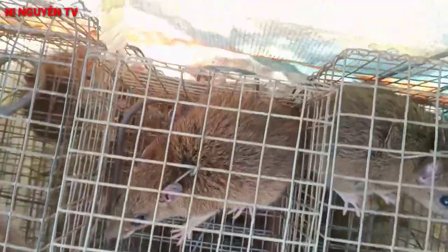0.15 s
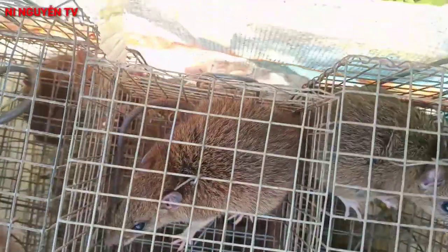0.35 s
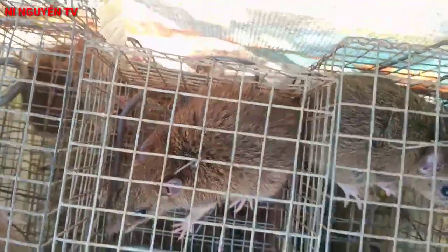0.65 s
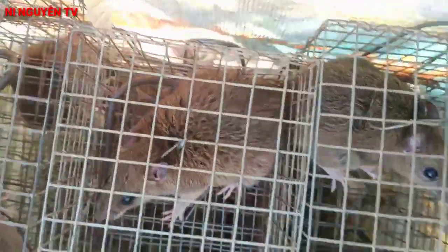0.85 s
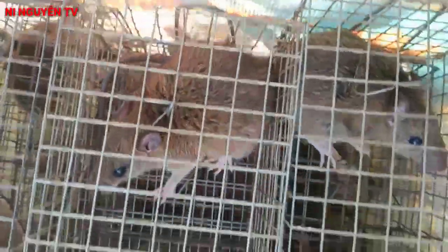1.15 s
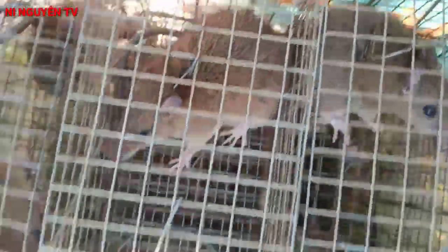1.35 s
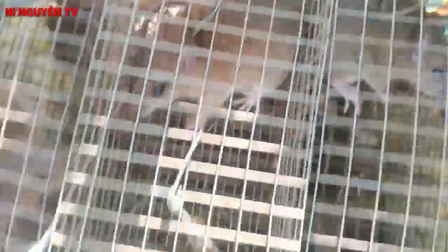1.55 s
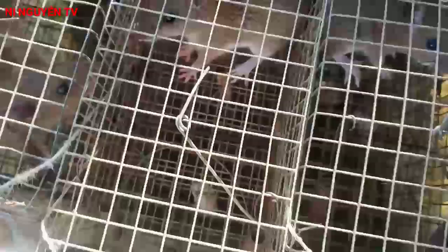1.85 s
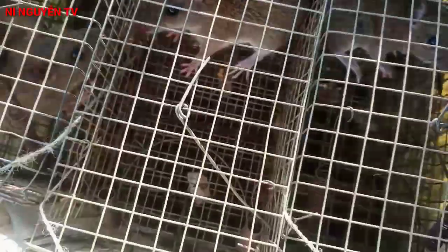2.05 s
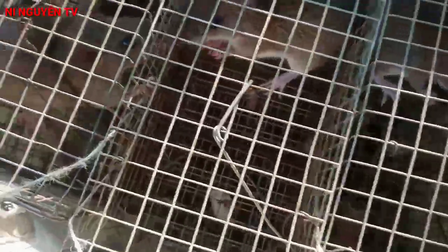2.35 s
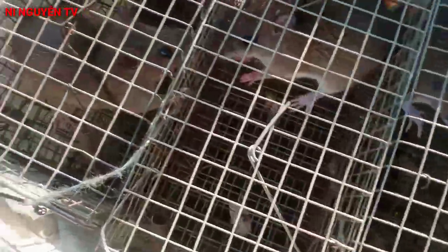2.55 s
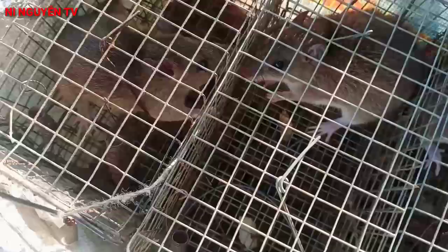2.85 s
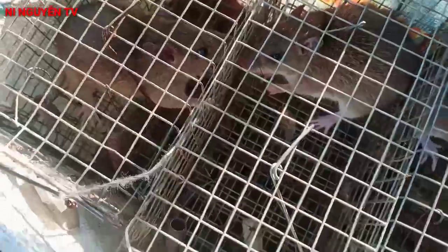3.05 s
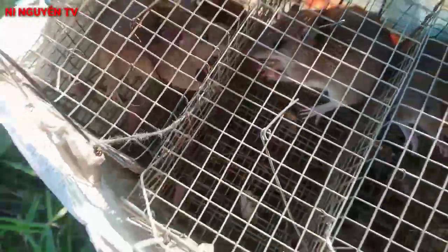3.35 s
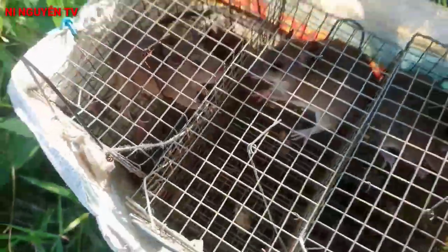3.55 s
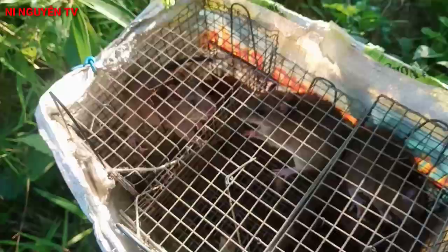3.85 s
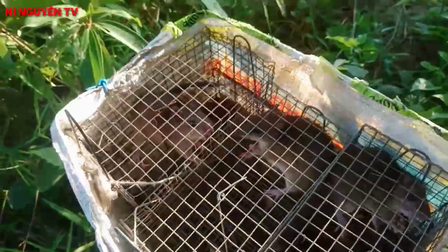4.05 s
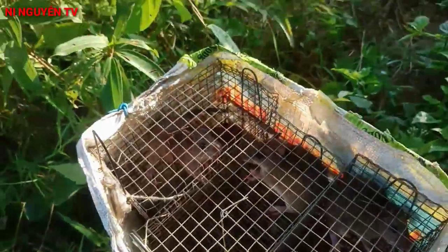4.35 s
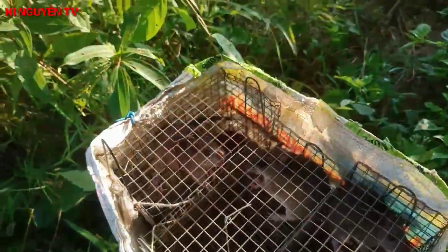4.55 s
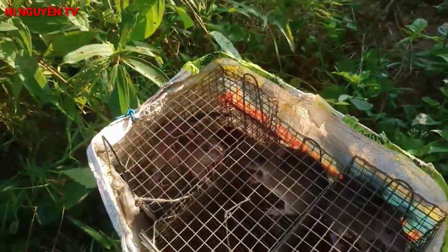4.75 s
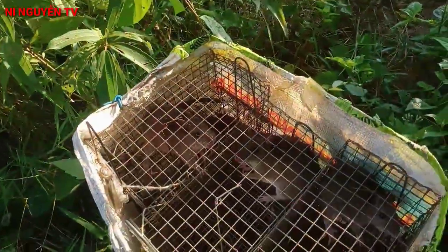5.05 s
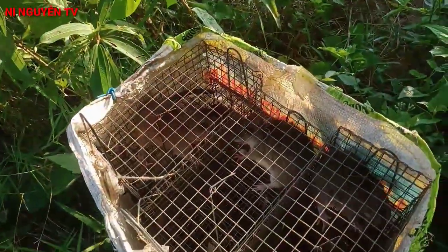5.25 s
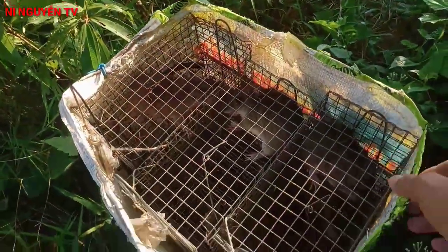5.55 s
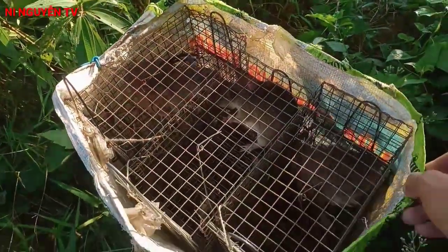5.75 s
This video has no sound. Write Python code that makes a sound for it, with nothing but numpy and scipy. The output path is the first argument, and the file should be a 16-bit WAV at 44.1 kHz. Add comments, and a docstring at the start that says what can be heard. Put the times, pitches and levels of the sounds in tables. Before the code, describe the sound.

The scene opens quietly outdoors, with a steady high insect drone, a faint distant engine hum and small birds chirping quickly. Claws scrape briefly on wire cages around 0.3, 0.5 and 1.6 seconds, and the foam box holding them takes a few soft knocks up to 2.5 seconds. At 1.8 seconds a rat whimpers and gives a shrill, trilling squeal about half a second long, repeating it at 2.5 and 3.2 seconds. Birds chirp again between 3 and 3.7 seconds. A second rat screams hoarsely at 3.8, 5 and 5.5 seconds, while a third whines in the gaps at 4.4, 5.3 and 5.8. Claws scrape again around 4.5 seconds. From 2 seconds on, a dog barks in the background, mostly in pairs. The rats are by far the loudest sound, so close that the mono microphone overloads slightly.

```python
"""Three trapped rats squeal: one trills, one screams hoarsely, a third whines between the screams.
Their vocal folds tremble near 1.2 kHz, turn chaotic under strain and are filtered by throat and mouth.
Claws scrape the wire cages, which stand outdoors in a foam box that takes soft knocks and adds echoes.
A dog barks in pairs; behind it small birds chirp, insects drone and an engine hums far off.
The mono microphone is so close to the rats that it overloads."""
import sys
import numpy as np
from scipy import signal
from scipy.fft import rfft, irfft, next_fast_len
from scipy.io import wavfile
from scipy.ndimage import uniform_filter1d

SR = 44100
rng = np.random.default_rng(int(sys.argv[2]) if len(sys.argv) > 2 else 0)


def output_pcm(signal):
    """Save a mono or channel-first signal as 16-bit PCM at the path in sys.argv[1].

    Samples are clipped to [-1, 1] before scaling.
    """
    pcm = np.clip(np.atleast_2d(signal).T, -1, 1) * 32767
    wavfile.write(sys.argv[1], SR, np.round(pcm).astype(np.int16))


N = 259786
TIME = np.arange(N) / SR


def trilling_rat():
    """Deep frequency modulation of the vocal folds is heard as a trill."""
    # calls: (start [s], end [s], relative level [dB], swell [dB], low pitch [Hz], high pitch [Hz],
    # climb time [s], tremble [share of pitch], first roughness [0-1], last roughness [0-1],
    # clearing time [s], mouth resonance [Hz], treble [dB])
    calls = [(1.83, 2.272, -15.5, 16.5, 1167, 1240, 2.47, .18, 0.67, 0.33, 2.09, 4260, -4),
             (2.503, 3.002, -11.5, 4, 1192, 1268, 2.8, 0.18, 0.71, 0.21, 2.68, 3900, 0.5),
             (3.209, 3.626, -11, 2, 1160, 1274, 3.38, .125, 0.51, 0.23, 3.27, 5130, 3)]
    # throat response: (frequency [Hz], gain [dB])
    throat = [(500, -13), (900, -13.5), (1250, -10), (1700, -9), (2350, -10.5), (2950, -13), (3650, -1.5),
              (5000, -1), (6200, -2), (7300, -9), (9300, -14), (10000, -12.5), (10800, -19.5),
              (15300, -8.5)]
    gesture = articulation(calls, attack_s=.0056, release_s=.021, rasp_db=-13.5,
                           dip=.035, sag=.012, flick=.18, mouth_shut=.3, mouth_sag=.014)
    return from_db(1.55) * rat_voice(calls, gesture, throat, tremble_hz=62.27, jitter=.022, hiss=.9,
                                     flutter_db=5.5, sputter_db=2, mouth_db=-4.5, mouth_width_hz=720)


def screaming_rat():
    """Strong pitch jitter makes a hoarse scream, sharpened by a narrow mouth resonance."""
    # calls: columns as in trilling_rat
    calls = [(3.806, 4.35, -8, -5.5, 1070, 1237, 3.91, 0.1058, .74, .24, 4.22, 4690, 0.065),
             (5.005, 5.31, -6.5, 2, 1089, 1218, 5.07, .13, 1, .92, 5.5, 4830, 1.5),
             (5.454, 5.8, -7.5, 1, 1216, 1251, 5.6, 0.1197, 0.98, 0.26, 5.725, 4785, 1.17)]
    # throat response: (frequency [Hz], gain [dB])
    throat = [(400, -18.5), (700, -3.5), (1000, -11), (1270, -5), (1700, -5), (2400, -7.5), (3050, -5.5),
              (3900, 1.5), (4700, -1.5), (5600, -3.5), (7200, -6.5), (9800, -6.5), (11000, -18),
              (14500, -7)]
    gesture = articulation(calls, attack_s=.01, release_s=.019, rasp_db=-24,
                           dip=.01, sag=.035, flick=.12, mouth_shut=.16, mouth_sag=.069)
    return from_db(1.95) * rat_voice(calls, gesture, throat, tremble_hz=71.7, jitter=.057, hiss=1,
                                     flutter_db=1.5, sputter_db=6, mouth_db=11, mouth_width_hz=480)


def whining_rat():
    """Shallow modulation, breath noise and a broad mouth resonance make a whine."""
    # calls: columns as in trilling_rat
    calls = [(4.39, 4.735, -13.5, -4.5, 1215, 1278, 4.56, 0.0654, 0.72, 0.18, 4.49, 4400, -2),
             (5.295, 5.475, -10, 6.5, 1190, 1215, 5.42, 0.074, 0.598, 0.28, 5.42, 5600, -0.063),
             (5.79, 5.95, -16, -15, 1165, 1237, 5.85, 0.043, 0.53, .48, 7.3, 4390, -0.2)]
    # throat response: (frequency [Hz], gain [dB])
    throat = [(600, -67), (1250, -5), (1800, -9), (2450, -7.5), (3050, -16), (3800, -1.5), (5000, -3.5),
              (6100, -4.5), (7300, -11), (10000, -13.5), (12000, -16), (14000, -8), (15500, -12)]
    gesture = articulation(calls, attack_s=.01, release_s=.015, rasp_db=-23,
                           dip=.00495, sag=.006, flick=.08, mouth_shut=.01, mouth_sag=.01)
    return from_db(-5) * rat_voice(calls, gesture, throat, tremble_hz=48.64, jitter=.032, hiss=1.5,
                                   flutter_db=3.5, sputter_db=2, mouth_db=4, mouth_width_hz=1500)


def articulation(calls, attack_s, release_s, rasp_db, dip, sag, flick, mouth_shut, mouth_sag):
    """Slow modulation shapes each call's level, pitch and timbre; the opening mouth raises a formant."""
    rasp_s, climb_s, bend_s, flick_s, clear_s, opening_s = .034, .09, .04, .014, .053, .043
    pitch, mouth_hz = np.full(N, 1200.), np.full(N, 4500.)
    level, tremble, rough, treble_db = np.zeros((4, N))
    for (start, end, db, swell_db, low_hz, high_hz, climbs, shake,
         first_rough, last_rough, clears, open_hz, bright_db) in calls:
        on = (TIME > start) & (TIME < end + rasp_s)
        t = TIME[on]
        since, left = t - start, np.maximum(end - t, 0)
        progress = np.minimum(since / (end - start), 1)
        # an arched swell releases into a short rasp
        effort_db = swell_db * (progress - .5) - 3 * (2 * progress - 1) ** 2
        voiced = np.sin(np.pi / 2 * np.minimum(left / release_s, 1)) ** 2
        rasp = from_db(rasp_db) * (1 - voiced) * np.minimum(1 - (t - end) / rasp_s, 1)
        level[on] = (1 - np.exp(-since / attack_s)) * (voiced + rasp) * from_db(db + effort_db)
        # the pitch dips, climbs, sags and finally flicks up
        dipping = np.exp(-((t - climbs + .07) / bend_s) ** 2)
        high = (1 + np.tanh((t - climbs) / climb_s)) / 2
        sagging = np.exp(-((left - .055) / bend_s) ** 2)
        ending = np.exp(-left / flick_s)
        bend = 1 - dip * dipping - sag * sagging + flick * ending
        pitch[on] = (low_hz + (high_hz - low_hz) * high) * bend
        tremble[on] = shake * (1 - .3046 * high) * (1 - ending)
        # the hoarse start clears, and the voice brightens as it swells
        clear = (1 + np.tanh((t - clears) / clear_s)) / 2
        rough[on] = np.where(t < end, first_rough + (last_rough - first_rough) * clear, 1)
        mouth_hz[on] = open_hz * (1 - mouth_shut * np.exp(-since / opening_s) - mouth_sag * progress)
        treble_db[on] = bright_db + .65 * effort_db
    pitch *= 1 + .003 * drift(14)
    rough = np.clip(rough * (1 + .1 * drift(12.6)), 0, 1)
    return level, pitch, tremble, rough, mouth_hz, treble_db


def rat_voice(calls, gesture, throat, tremble_hz, jitter, hiss,
              flutter_db, sputter_db, mouth_db, mouth_width_hz):
    """Source and filter: vocal-fold pulses and breath noise excite the throat and mouth resonances."""
    level, pitch, tremble, rough, mouth_hz, treble_db = gesture
    # each tremble is a rounded arch of pitch with a sharp dip, where the tone weakens
    arch = np.abs(np.sin(phase_of(tremble_hz * (1 + .11 * drift(25))) / 2)) - 2 / np.pi
    wobble = tremble * (arch * from_db(2.2 * drift(35)) + .09 * drift(30))
    phase = phase_of(pitch * (1 + wobble + jitter * rough * drift(447)))
    breath = rng.standard_normal(N) * (1 + .76 * np.cos(phase))   # air rushes through once a cycle
    source = coloured(pulses(phase, count=13) * from_db(1.8 * arch) + hiss * rough * breath, throat)
    # the mouth picks out the nearest overtone and quivers under strain
    mouth = resonance(source, mouth_hz * (1 + .04 * rough * drift(130)), mouth_width_hz)
    voice = treble_shelf(source + from_db(mouth_db) * mouth, treble_db, corner_hz=9000)
    # a call sputters before the folds settle
    onsets = sum(decay(start, fade_s=.016) for start, *_ in calls)
    flutter = rough * drift(124)
    sputter = onsets * np.sin(phase_of(160 * (1 + .101 * drift(51))))
    return level * evened(voice * from_db(flutter_db * flutter + sputter_db * sputter))


def whimpers():
    """The trilling rat whimpers in short downward frequency sweeps."""
    # runs of whimpers: (start [s], notes [count], relative level [dB])
    runs = [(1.826, 8, -29.5), (3.206, 1, -35)]
    notes = notes_of(runs, gap_s=.021, uneven=.241, first_db=3)
    return from_db(6) * glides(notes, start_hz=2070, end_hz=1220, length_s=.026, waver=.083)


def claws():
    """Friction of skidding claws excites the resonances of the cage wire."""
    # scrapes: (time [s], relative level [dB])
    scrapes = [(0.2673, -22), (0.5407, -27.5), (1.0465, -43), (1.6008, -25), (1.72, -26), (2.4544, -43),
               (4.3674, -21.5), (4.5644, -16)]
    # wire response: (frequency [Hz], gain [dB])
    wire = [(1500, -17), (3300, 2.5), (4100, 3), (5000, 0), (6000, 4.5), (6900, 0), (8000, -6),
            (14000, -28)]
    return from_db(-4) * touches(scrapes, wire, fade_s=.013)


def knocks():
    """Soft impacts excite the low, heavily damped resonance of the foam box."""
    # impacts: (time [s], relative level [dB])
    impacts = [(0.224, -30), (1.344, -37), (1.784, -32), (2.449, -35.5)]
    # box response: (frequency [Hz], gain [dB])
    box = [(300, -16), (600, 7), (900, 9), (1400, -3), (3000, -19), (8000, -33)]
    return from_db(4) * touches(impacts, box, fade_s=.01)


def dog():
    """Source and filter: each bark starts harshly, rises in pitch and clears as it sags."""
    # barks: (start [s], length [s], highest pitch [Hz], relative level [dB])
    barks = [(1.994, 0.13, 471, -22.5), (2.2, 0.12, 466, -23.5), (2.617, 0.12, 419.2, -26.5),
             (2.846, 0.11, 434.6, -26.5), (4.361, 0.18, 358.3, -29.5), (4.624, .118, 403, -28.5),
             (5.319, 0.13, 384, -27), (5.801, 0.11, 365.4, -30.5)]
    # throat response: (frequency [Hz], gain [dB])
    throat = [(150, -29), (280, 3), (450, 1), (750, 2.5), (1000, -6), (1300, -5), (1800, -7), (2500, -15.5),
              (4000, -20)]
    top_at, fade_from = .33, .54   # shares of a bark's length
    attack_s, first_rough, last_rough = .0015, .83, .45
    pitch, level, rough = np.full(N, 300.), np.zeros(N), np.zeros(N)
    for start, length, top_hz, db in barks:
        on = (TIME > start) & (TIME < start + length)
        progress = (TIME[on] - start) / length
        pitch[on] = top_hz * (1 - .98 * (progress - top_at) ** 2)
        attack = 1 - np.exp(-progress * length / attack_s)
        fade = np.sqrt(np.minimum((1 - progress) / (1 - fade_from), 1))
        level[on] = from_db(db + 4.5) * attack * fade
        rough[on] = first_rough + (last_rough - first_rough) * progress
    phase = phase_of(pitch * (1 + .035 * rough * drift(150)))
    breath = rng.standard_normal(N) * (1 + np.cos(phase))
    voice = coloured(pulses(phase, count=9) + 2.4 * rough * breath, throat)
    return level * evened(voice * from_db(4 * rough * drift(90)))


def birds():
    """Frequency-swept tones: quick falling chirps, raspier rising ones and thin far whistles."""
    # runs of chirps: (start [s], notes [count], relative level [dB])
    falling_runs = [(0.028, 2, -32.5), (0.455, 3, -34), (0.684, 3, -33), (0.916, 2, -37), (1.184, 2, -34),
                    (3.109, 3, -21.5), (3.631, 3, -20.5)]
    rising_runs = [(0.282, 3, -20), (1.313, 3, -27.5)]
    # sinking whistles: (start [s], end [s], first pitch [Hz], final level [dB])
    whistles = [(0.535, 0.793, 2960, -39), (1.72, 1.834, 3100, -43)]
    sag_hz_per_s, swell_db_per_s, edge_s = 1100, 34, .009
    falling = notes_of(falling_runs, gap_s=.036, uneven=.044, first_db=-3)
    out = glides(falling, start_hz=5180, end_hz=4170, length_s=.034, waver=.0254)
    rising = notes_of(rising_runs, gap_s=.047, uneven=.038, first_db=0)
    out += from_db(-5) * glides(rising, start_hz=3750, end_hz=4970, length_s=.056, waver=.1)
    for start, end, first_hz, db in whistles:
        t = np.clip(TIME, start, end)
        pitch = (first_hz - sag_hz_per_s * (t - start)) * (1 + .0137 * drift(210))
        gate = np.clip(np.minimum(TIME - start, end - TIME) / edge_s, 0, 1)
        out += from_db(db - swell_db_per_s * (end - t)) * gate * np.sin(phase_of(pitch))
    return out


def insects(throb_hz):
    """Many tiny resonators add incoherently, so each choir is a throbbing band of noise."""
    # choirs: (centre [Hz], bandwidth [Hz], level [dB], relative throb depth [dB])
    choirs = [(4820, 310, -43.5, 4), (7230, 380, -38.5, 1), (8300, 1300, -44, 2), (13100, 2000, -44, 5),
              (14740, 650, -38, 4.5)]
    beat = np.sin(phase_of(throb_hz * (1 + .45 * drift(12))))
    out = np.zeros(N)
    for hz, width, db, throb_db in choirs:
        band = signal.butter(2, [hz - width / 2, hz + width / 2], "band", fs=SR, output="sos")
        buzz = signal.sosfilt(band, rng.standard_normal(N))
        throb = from_db(throb_db * (.6 * beat + .55 * drift(60)))
        out += from_db(db) * rms_one(buzz * throb)
    return out


def engine(cycle_hz):
    """A steady engine radiates harmonics of its cycle rate; only the low orders carry far."""
    # harmonics: (order [multiple of the cycle rate], relative level [dB])
    orders = [(4, -31.5), (5, -48), (6, -44.5), (7, -39.5), (8, -25), (9, -55), (10, -68), (12, -41),
              (16, -50)]
    # envelope of the hum: (time [s], relative level [dB])
    envelope = [(0.1, -27.5), (1.94, -27), (2.12, -35), (2.21, -28), (3.5, -27.5), (3.85, -29.5),
                (5.12, -30.5), (5.8, -29)]
    phase = phase_of(cycle_hz * (1 + .0026 * drift(1.4)))
    hum = sum(from_db(db + drift(3.9)) * np.sin(round(order) * phase + rng.uniform(0, 2 * np.pi))
              for order, db in orders)
    level_db = np.interp(TIME, *np.transpose(envelope))
    return from_db(level_db + .5) * rms_one(hum)


def open_air():
    """Ambient noise is broadband, with most of its power at low frequencies."""
    # noise spectrum: (frequency [Hz], relative spectral density [dB])
    spectrum = [(25, -23), (60, 9), (150, 3), (250, -0.5), (400, -7.5), (1000, -10), (2000, -12),
                (3200, -13), (4300, -15.5), (5800, -20), (9000, -18.5), (11000, -19.5), (15000, -29)]
    return from_db(-34) * coloured(rng.standard_normal(N), spectrum)


def reflections(x):
    """Convolution adds close echoes and a faint tail scattered by ground and leaves."""
    # echoes from the box walls and the ground: (delay [s], gain [dB])
    echoes = [(.00168, -31), (.0043, -19.5), (.0047, -23), (.0058, -17)]
    t60_s, tail_db = .09, -18
    t = TIME[:SR // 4]
    tail = rng.standard_normal(len(t)) * from_db(-60 * t / t60_s) * (t > .002)
    response = from_db(tail_db) * tail / np.sqrt(np.sum(tail ** 2))
    response[0] = 1
    for delay, db in echoes:
        response[round(delay * SR)] += from_db(db)
    return signal.fftconvolve(x, response)[:N]


def touches(events, body, fade_s, grains_per_s=5000):
    """Each contact is a fading burst of random impulses, filtered by the body it lands on."""
    force = sum(from_db(db) * decay(start, fade_s) for start, db in events)
    grit = rng.standard_normal(N) * (rng.random(N) < grains_per_s / SR)
    return force * coloured(grit, body)


def notes_of(runs, gap_s, uneven, first_db):
    """Nearly periodic notes (time [s], level [dB]); the first of each run is offset by first_db."""
    return [(start + gap_s * (k + uneven * rng.uniform(-1.04, 1)), db) if k else (start, db + first_db)
            for start, count, db in runs for k in range(round(count))]


def glides(notes, start_hz, end_hz, length_s, waver):
    """Each note is a wavering linear sine sweep that rises fast and fades more slowly."""
    pitch, level = np.full(N, float(start_hz)), np.zeros(N)
    for start, db in notes:
        progress = (TIME - start) / length_s
        on = (progress > 0) & (progress < 1)
        pitch[on] = start_hz + (end_hz - start_hz) * progress[on]
        level[on] = from_db(db) * np.sin(np.pi * progress[on] ** .42)
    return level * np.sin(phase_of(pitch * (1 + waver * drift(262))))


def pulses(phase, count):
    """Equal harmonics, dispersed in phase over the cycle; unit power."""
    return sum(np.cos(k * phase + np.pi * k * k / count) for k in range(1, count + 1)) * np.sqrt(2 / count)


def resonance(x, hz, width_hz):
    """A damped resonator with a moving centre and unit peak gain."""
    carrier = np.exp(1j * phase_of(hz))
    pole = np.exp(-np.pi * width_hz / SR)
    return 2 * np.real(carrier * signal.lfilter([1 - pole], [1, -pole], x / carrier))


def treble_shelf(x, gain_db, corner_hz):
    """A shelving filter with time-varying gain."""
    treble = signal.sosfilt(signal.butter(1, corner_hz, "high", fs=SR, output="sos"), x)
    return x + (from_db(gain_db) - 1) * treble


def coloured(x, spectrum):
    """Filtering by a smooth response (frequency [Hz], gain [dB]); unit power."""
    hz, db = np.transpose(spectrum)
    size = next_fast_len(N + SR // 10)
    bin_hz = np.maximum(np.arange(size // 2 + 1) * SR / size, 1)
    bass_rolloff = np.minimum(bin_hz / hz[0], 1) ** 2
    gain = from_db(np.interp(np.log(bin_hz), np.log(hz), db))
    return rms_one(irfft(rfft(x, size) * bass_rolloff * gain, size)[:N])


def drift(hz):
    """Low-passed noise wavers at up to about this rate; unit power."""
    pole = np.exp(-2 * np.pi * hz / SR)
    return rms_one(signal.lfilter([1], [1, -2 * pole, pole * pole], rng.standard_normal(N + SR))[SR:])


def decay(start, fade_s):
    """Exponential decay from a sudden onset."""
    return (TIME >= start) * np.exp(-np.abs(TIME - start) / fade_s)


def phase_of(hz):
    """Phase is the time integral of frequency."""
    return 2 * np.pi * np.cumsum(hz) / SR


def evened(x):
    """Division by the running 20 ms RMS holds the power at one."""
    return x / np.sqrt(np.maximum(uniform_filter1d(x * x, SR // 50), 1e-9))


def rms_one(x):
    """Normalisation to unit power."""
    return x / np.sqrt(np.mean(x ** 2) + 1e-20)


def from_db(db):
    """Decibels to amplitude ratio."""
    return 10 ** (np.asarray(db) / 20)


def scene():
    """Superposition of the rats in front and the countryside behind, the same in both channels."""
    rats = trilling_rat() + screaming_rat() + whining_rat() + whimpers()
    animals = reflections(rats + claws() + knocks() + dog() + birds())
    mono = animals + insects(throb_hz=19.8) + engine(cycle_hz=16.52) + open_air()
    return np.stack([mono, mono])


def record(dry):
    """Saturation flattens the loudest peaks at the input's limit; a steep low-pass cuts the top."""
    ceiling, cutoff_hz = .98, 15500
    saturated = dry / (1 + (dry / ceiling) ** 6) ** (1 / 6)
    return signal.sosfilt(signal.ellip(12, .2, 80, cutoff_hz, fs=SR, output="sos"), saturated)


dry = scene()
out = record(dry)
output_pcm(out)
```